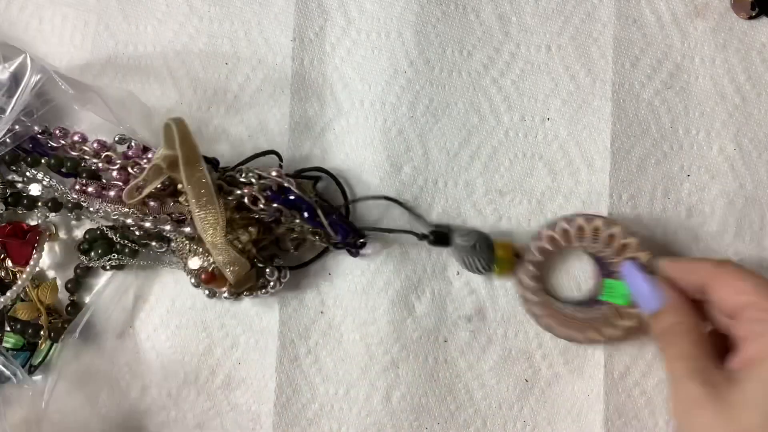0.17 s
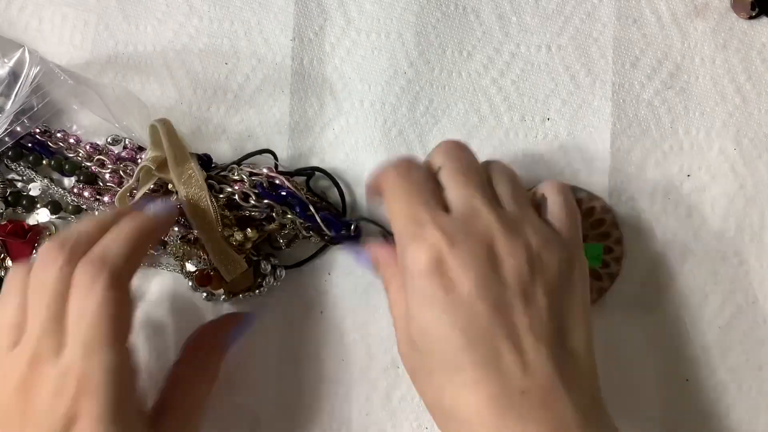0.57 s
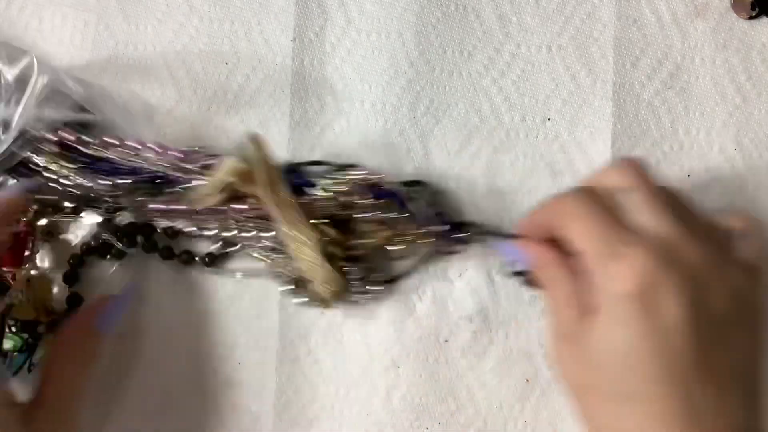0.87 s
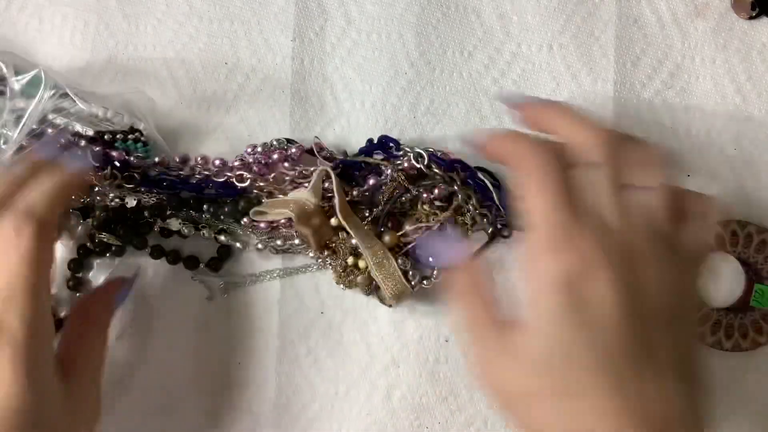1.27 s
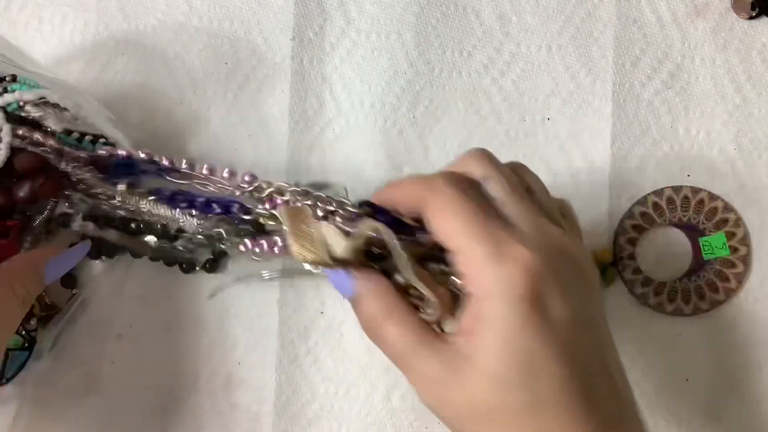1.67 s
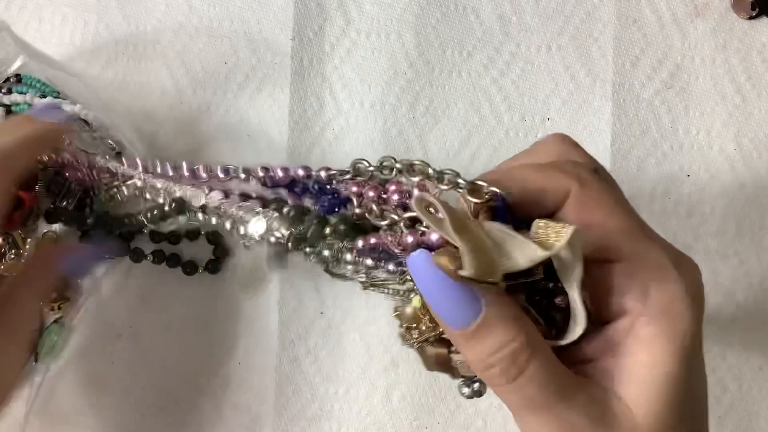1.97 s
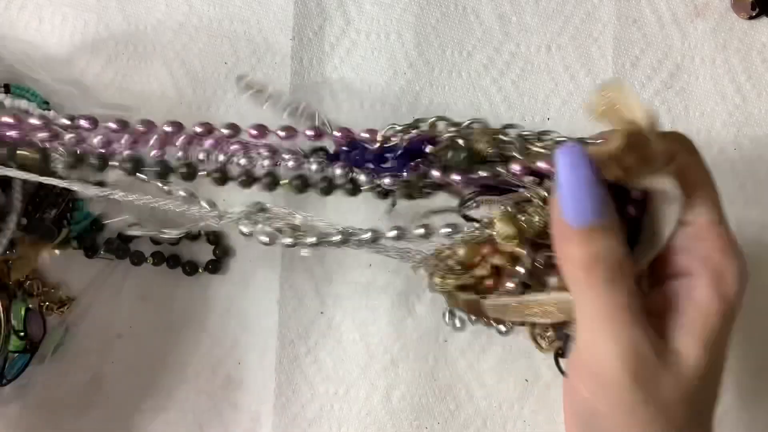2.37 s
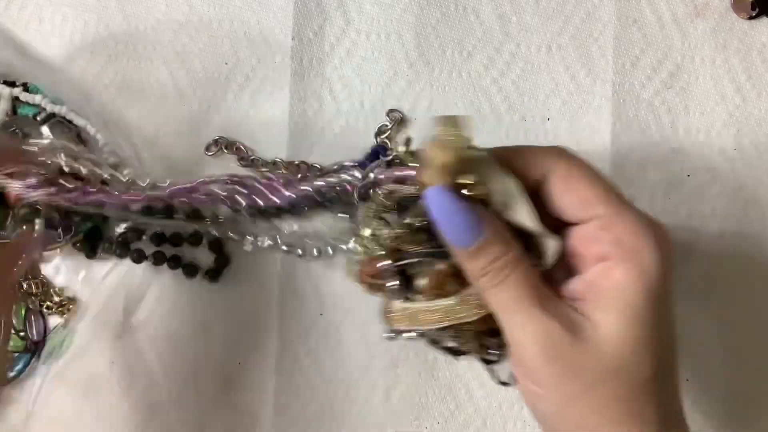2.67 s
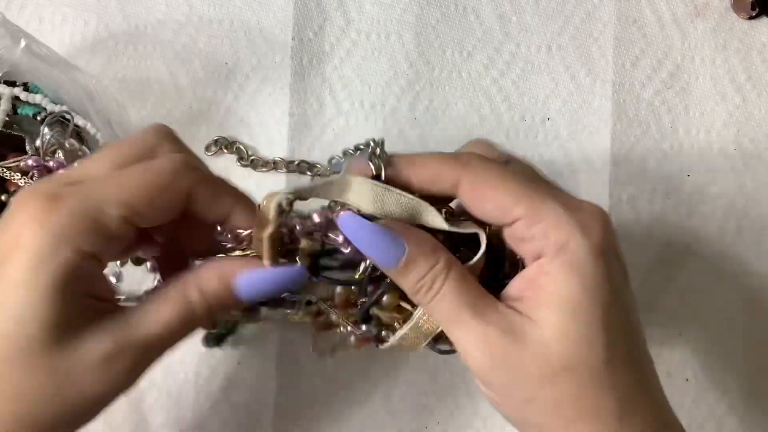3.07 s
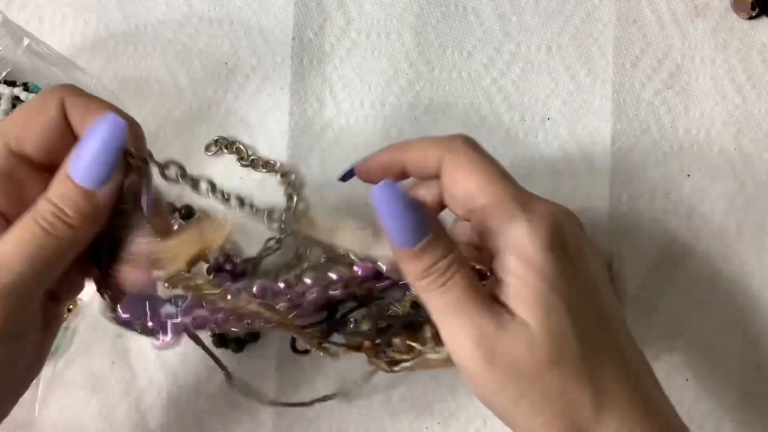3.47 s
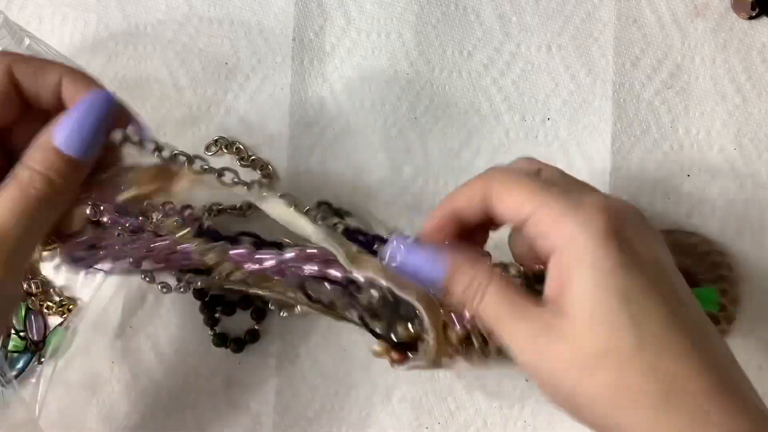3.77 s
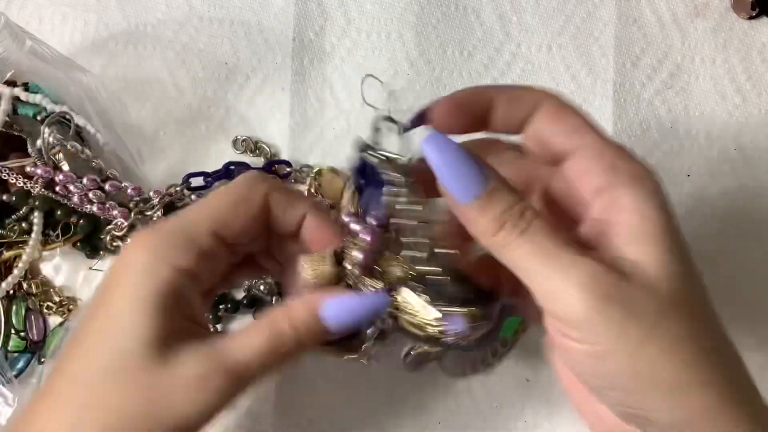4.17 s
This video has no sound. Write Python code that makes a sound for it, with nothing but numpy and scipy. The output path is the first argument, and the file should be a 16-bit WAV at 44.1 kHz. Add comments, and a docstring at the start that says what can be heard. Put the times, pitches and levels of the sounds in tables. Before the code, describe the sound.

Hands drag a tangle of bead necklaces and fine chains over a cloth-covered table, making a soft, uneven rustle dotted with small clicks. The table gives a few dull bumps. Midway the clicking gets busier, with tiny metallic pings and light pendant knocks. The rustle then thins as the tangle is lifted, and one sharper clack comes near the end. The microphone is close, in a small quiet room.

```python
"""Bead necklaces and chains rustle as hands draw them over a cloth-covered table, close by in a small room.
The rustle is swarms of tiny collisions: fine links, beads, and the heap dragging on the cloth.
Lifting the tangle frees the links and unloads the cloth. Single beads click, small metal parts ping,
heavier pendants knock on the table, and the table top thumps when bumped. Low room tone lies underneath."""
import sys
import numpy as np
from scipy import signal
from scipy.fft import rfft, irfft, next_fast_len
from scipy.io import wavfile
from scipy.ndimage import uniform_filter1d, map_coordinates

SR = 44100
rng = np.random.default_rng(int(sys.argv[2]) if len(sys.argv) > 2 else 0)


def persist_wave(psi):
    """Save psi, clipped to +-1, as 16-bit WAV."""
    counts = np.round(np.clip(psi, -1, 1) * 32767).astype(np.int16)
    wavfile.write(sys.argv[1], SR, np.atleast_2d(counts).T)


N = 190159
TOP_HZ = 16000


def rustle(gains, falter_db=0.8, clump_db=3.5):
    """Links and beads tumble in little clumps while the hand drags the heap a little unevenly."""
    links_gain, beads_gain, drag_gain = gains * amp(falter_db * wobble(knots_per_s=25))
    clumps = amp(clump_db * wobble(knots_per_s=220))
    links = links_gain * chain_links(clumps)
    beads = amp(-2) * beads_gain * tumbling_beads(clumps)
    drag = drag_gain * cloth_drag()
    return in_room(links + beads + drag, wet_db=-11)


# Hand moves. Each row: start, rise, hold and fall in seconds, strength in dB,
# lift from 0 (dragging on the cloth) to 1 (dangling).
HAND_MOVES = [(0.0, 0.0085, 0.028, 0.088, -58, 0), (0.107, 0.021, 0.053, 0.05, -69.5, 0.59),
              (0.369, .015, 0.071, .05, -60.5, 0), (0.404, 0.026, .03, .04, -54, 0.08),
              (0.612, 0.057, 0.025, .1, -51, 0.4), (0.658, 0.068, 0.16, 0.066, -44, 0.44),
              (0.9, 0.015, 0.067, .1, -57, 0.55), (1.032, .02, .03, 0.13, -65, 0),
              (1.18, 0.032, 0.024, 0.067, -49.5, 0.14), (1.254, 0.018, 0.21, .1, -54.5, 0.26),
              (1.504, 0.047, 0.11, 0.2, -54, 0.82), (1.616, 0.11, 0.074, 0.28, -52, 0.83),
              (1.905, 0.078, 0.4, .15, -50.5, 0.47), (2.317, 0.049, 0.15, .1, -52.5, 0.3),
              (2.465, 0.033, 0.073, 0.057, -44, 0.65), (2.545, .02, 0.047, 0.027, -46.5, 0.28),
              (2.753, 0.067, 0.048, 0.39, -54, 0.95), (2.94, 0.032, 0.082, 0.085, -59, 0),
              (3.019, 0.052, 0.31, 0.58, -61.5, 1), (3.496, 0.021, 0.087, .08, -63.5, 0.82),
              (3.706, 0.065, 0.072, 0.06, -51.5, 0.84), (3.804, 0.018, 0.037, 0.052, -46.5, 0.22),
              (4.267, 0.051, .03, .05, -51, 0.81)]


def handling(swell_db=20, sag_db_per_s=6.5):
    """Gains of links, beads and cloth: lifting frees the fine links and takes weight off the cloth."""
    t, power = np.arange(N) / SR, np.zeros((3, N))
    grip = (0.5, 0.12, N / SR, 0.12, -64, 0.58)  # held to the end: the tangle is never quite still
    moves = [(move, sag_db_per_s) for move in HAND_MOVES] + [(grip, 0)]
    for (start_s, rise_s, hold_s, fall_s, db, lift), sag in moves:
        held_s = t - start_s - rise_s
        ramp = np.minimum(held_s / rise_s, (hold_s - held_s) / fall_s)
        shape_db = swell_db * np.minimum(ramp, 0) - sag * np.clip(held_s, 0, hold_s)
        links_db, drag_db = -10 + 24 * lift, 2 - 14.5 * lift
        power += np.outer(amp([links_db, 0, drag_db]), amp(db + np.maximum(shape_db, -100))) ** 2
    return np.sqrt(power)


# Tone of the fine links. Each row: frequency in Hz, relative gain in dB.
LINK_SPECTRUM = [(1500, -26.5), (3500, -3.5), (6000, 1.5), (6700, -10.5), (9000, -8.5), (12600, -3),
                 (14000, -3.5), (16000, 1)]


def chain_links(clumps, shimmer_hz=12600, shimmer_db=-3):
    """Fine links collide; many like links share one ring, a narrow shimmer."""
    swarm = contacts(per_s=3200, centre_hz=10500, log_spread=0.36, t60_cycles=18.6, size_db=2.5)
    links = colour(swarm, LINK_SPECTRUM) * clumps
    return unit(links + amp(shimmer_db) * resonate(links, shimmer_hz, width_hz=250))


# Tone of the beads. Each row: frequency in Hz, relative gain in dB.
BEAD_SPECTRUM = [(600, -3), (1500, -9.5), (2500, -5), (3500, 0), (5000, 7.5), (5900, 2.5), (6600, 0),
                 (12000, -3)]


def tumbling_beads(clumps):
    """Beads collide, ringing lower than the links."""
    swarm = contacts(per_s=2200, centre_hz=4000, log_spread=0.87, t60_cycles=12, size_db=2.5)
    return unit(colour(swarm, BEAD_SPECTRUM) * clumps)


# Tone of the heap on the cloth. Each row: frequency in Hz, relative gain in dB.
CLOTH_SPECTRUM = [(40, -42), (100, 1), (250, -2), (400, -3), (620, -1.5), (850, -4), (1300, 3), (2300, 1.5),
                  (6000, -20)]


def cloth_drag():
    """The heap drags over the cloth in dull contacts that barely ring."""
    swarm = contacts(per_s=1100, centre_hz=900, log_spread=1.12, t60_cycles=1.85, size_db=3.5)
    return unit(colour(swarm, CLOTH_SPECTRUM))


def contacts(per_s, centre_hz, log_spread, t60_cycles, size_db):
    """A swarm of tiny collisions, each a damped ring of its own pitch and size; steady rms 1."""
    when, pitch, size = rng.random((int(per_s * N / SR), 3)).T
    hz = np.minimum(centre_hz * np.exp(log_spread * (2 * pitch - 1)), TOP_HZ)[:, None]
    k = np.arange(SR // 250)
    strength = amp(size_db * np.minimum(-np.log(1 - size), 4))  # many small, few large
    rings = strength[:, None] * np.sin(2 * np.pi * hz * k / SR) * fade(k / SR, t60_cycles / hz)
    positions = (when * N).astype(int)[:, None] + k
    swarm = np.bincount(positions.ravel(), rings.ravel(), N)[:N]
    local_power = np.abs(uniform_filter1d(swarm ** 2, SR // 12))
    return swarm / np.sqrt(local_power + 1e-9)


# Distinct snaps of beads and clasps. Each row: start in seconds, level in dB, band centre in Hz.
BEAD_CLICKS = [(.0264, -37, 8950), (.0302, -46.5, 8600), (.4386, -45, 12400), (.4764, -25, 4260),
               (.6165, -46, 8600), (.6318, -38.5, 4800), (.7581, -31, 5250), (.871, -29, 4740),
               (.8943, -31.5, 10500), (.9652, -38, 13400), (1.0023, -40, 6360), (1.0745, -38.5, 8350),
               (1.1273, -38, 7300), (1.285, -41.5, 3500), (1.3636, -27, 3740), (1.3716, -30.5, 5070),
               (1.4395, -29, 4630), (1.4489, -36, 8060), (1.5382, -39, 5000), (1.9424, -34.5, 8300),
               (2.0164, -25, 6530), (2.1215, -32.5, 5060), (2.1778, -22, 4300), (2.4178, -31, 4900),
               (2.4557, -26.5, 3950), (2.4598, -27.5, 5810), (2.4904, -25, 4440), (2.5011, -17, 6430),
               (2.6805, -37.5, 8000), (2.9443, -34.5, 10300), (3.1963, -32, 11500), (3.363, -35, 11500),
               (3.397, -33, 11700), (3.6671, -37, 8800), (3.7061, -33, 10500), (3.7663, -32.5, 10500),
               (3.829, -23.5, 7500), (3.991, -43, 10400), (4.0394, -42, 8600), (4.0523, -33.5, 10000),
               (4.0872, -33.5, 12500), (4.1107, -32, 11850), (4.3021, -31, 9500)]


def bead_clicks(links_gain, chatter_db=-21, ring_db=-3, band_ratio=1.42):
    """One hard bead snaps against another: a crack, a short ring from each, faint chatter of neighbours."""
    out, t = np.zeros(N), np.arange(SR // 4) / SR
    contact, chatter = fade(t, t60_s=0.004), fade(t, t60_s=0.04)
    for start_s, db, hz in BEAD_CLICKS + stray_clicks(links_gain):
        crack = rng.standard_normal(len(t)) * (contact + amp(chatter_db) * chatter)
        large_bead = np.sin(2 * np.pi * hz * 0.67 * t)
        small_bead = np.sin(2 * np.pi * hz * 1.122 * t)
        ring = amp(ring_db) * (large_bead + small_bead) * contact
        snap = band(crack + ring, hz / band_ratio, hz * band_ratio, order=1)
        snap = band(snap, 1080, TOP_HZ, order=2)
        snap /= np.sqrt(np.sum(snap[:SR // 500] ** 2) / (SR // 1000))  # first 2 ms, as if packed in 1 ms
        add(out, start_s, in_room(amp(db) * snap, wet_db=-9))
    return out


def stray_clicks(links_gain, per_s=17, over_db=7, spread_db=1, centre_hz=10000):
    """Click rows for small chance snaps, as strong as the links are moving."""
    count = int(per_s * N / SR)
    when, size, pitch = rng.random((count, 3)).T
    onsets = ((np.arange(count) + when) / count * N).astype(int)
    level_db = 20 * np.log10(links_gain[onsets]) + over_db + spread_db * (2 * size - 1)
    return list(zip(onsets / SR, level_db, centre_hz * 2 ** (pitch - 0.5)))


# Modes of a pendant on the table. Each row: frequency in Hz, width in Hz, gain in dB.
PENDANT_MODES = [(342, 180, -4.5), (434.5, 24, 1.5), (637, 130, -6), (1016, 12, 1.5), (1394, 130, -5),
                 (1500, 15, 2), (2026, 230, -0.5), (2740, 130, 0), (3470, 590, 0), (3840, 360, 4.5),
                 (4230, 860, -3.5), (5300, 110, 2.5), (5900, 220, 2)]
# Pendant landings, and the short lower clack of the loudest bead snap at 2.5 s. Each row: start in
# seconds, level in dB, low band edge in Hz (heavier is lower), high band edge in Hz, rattle t60 in seconds.
KNOCK_HITS = [(0.013, -47, 900, 2230, 0.013), (.148, -42, 198, 1090, 0.019),
              (0.452, -43.5, 900, 2200, 0.025), (.477, -36, 350, 4000, 0.013),
              (.758, -41, 300, 2010, 0.025), (0.874, -41, 500, 2180, 0.01),
              (1.211, -46.5, 815, 2770, 0.043), (1.29, -47, 700, 1590, 0.028),
              (1.372, -44.5, 600, 2600, 0.0091), (1.448, -39.5, 700, 2430, 0.011),
              (2.1774, -31, 516, 4730, 0.063), (2.189, -38.5, 217, 2240, 0.06),
              (2.251, -39.5, 500, 1680, 0.021), (2.335, -31, 249, 4000, 0.047),
              (2.339, -28, 241, 5200, 0.086), (2.5005, -28, 2320, 5000, .006),
              (2.99, -42.5, 303, 1820, 0.021), (3.029, -44.5, 402, 2040, 0.018),
              (3.552, -48, 140, 660, 0.03), (3.718, -50.5, 1160, 2530, 0.021),
              (3.823, -19.5, 384, 7600, 0.019)]


def knocks(crack_db=-6, strike_db=-1):
    """Pendant landings and one bead clack: a blow and rattle stir damped modes; cloth dulls soft landings."""
    out, t = np.zeros(N), np.arange(SR // 2) / SR
    for start_s, db, low_hz, high_hz, t60_s in KNOCK_HITS:
        rattle = rng.standard_normal(len(t)) * fade(t, t60_s) * (1 - np.exp(-t / 0.0016))
        force = rattle + amp(strike_db) * np.linalg.norm(rattle) * (t == 0)
        ring = sum((-1) ** k * amp(mode_db) * resonate(force, hz, width_hz)
                   for k, (hz, width_hz, mode_db) in enumerate(PENDANT_MODES))
        blow = band(amp(crack_db) * rattle + ring, low_hz, high_hz, order=2)
        blow /= np.sqrt(np.mean(blow[:SR // 250] ** 2))  # rms 1 over the first 4 ms
        add(out, start_s, in_room(amp(db) * blow, wet_db=-7))
    return out


# Small metal parts ringing. Each row: start in seconds, level in dB, pitch in Hz, t60 in seconds.
METAL_PINGS = [(0.144, -53, 2790, 0.062), (1.670, -26.5, 13950, .025), (2.036, -32, 9580, 0.032),
               (2.094, -33, 14000, 0.031), (2.128, -26.5, 14000, 0.031), (2.185, -20.5, 8880, 0.055),
               (2.186, -32, 10070, 0.056), (2.223, -39, 8830, 0.068), (2.346, -36, 12760, 0.16),
               (2.407, -41, 12700, 0.068), (2.461, -22.5, 8850, 0.03), (2.503, -23, 8780, 0.09),
               (2.507, -23, 14200, 0.028), (2.521, -30.5, 11150, 0.12), (3.540, -40.5, 12300, 0.11),
               (3.826, -54, 3470, 0.54), (3.837, -43, 12620, 0.21)]


def metal_pings(tremble=0.32):
    """Small metal parts ring briefly, trembling against the chain they hang from."""
    out, t = np.zeros(N), np.arange(SR // 3) / SR
    for start_s, db, hz, t60_s in METAL_PINGS:
        flutter, phase_rad = [tremble * unit(band(noise, 40, 350, order=1))
                              for noise in rng.standard_normal((2, len(t)))]
        ring = (1 + flutter) * np.sin(2 * np.pi * hz * t + phase_rad) * fade(t, t60_s)
        add(out, start_s, in_room(amp(db) * ring, wet_db=-13))
    return out


# Bumps on the table top. Each row: start in seconds, level in dB.
TABLE_THUMPS = [(0.478, -43), (0.833, -45), (1.136, -31), (1.375, -37), (2.522, -42), (3.824, -37.5)]


def table_thumps(lower_hz=232, upper_hz=300, upper_db=-7, t60_s=0.048):
    """Bumped by the hand or the heap, the table top rings briefly in two low modes."""
    out, t = np.zeros(N), np.arange(SR // 3) / SR
    board = np.sin(2 * np.pi * lower_hz * t) + amp(upper_db) * np.sin(2 * np.pi * upper_hz * t)
    thump = board * fade(t, t60_s) * (1 - np.exp(-t / 0.0011))
    for start_s, db in TABLE_THUMPS:
        add(out, start_s, in_room(amp(db) * thump, wet_db=-13))
    return out


# Reverberation of the room. Each row: frequency in Hz, t60 in seconds.
ROOM_DECAY = [(150, 0.47), (400, 0.26), (1000, 0.26), (3000, 0.22), (7000, 0.19), (15000, 0.17)]


def in_room(x, wet_db, build_s=0.0014):
    """The sound plus a fresh diffuse tail; each frequency dies at its own speed."""
    hz, frame_s, noise = signal.stft(rng.standard_normal(SR // 2), SR, nperseg=256)
    decay = fade(frame_s, along(ROOM_DECAY, hz)[:, None])
    tail = signal.istft(noise * decay, SR, nperseg=256)[1]
    tail *= 1 - np.exp(-(np.arange(len(tail)) / SR / build_s) ** 2)
    return x + amp(wet_db) * signal.fftconvolve(x, tail / np.linalg.norm(tail))[:len(x)]


# Tone of the room's air. Each row: frequency in Hz, relative gain in dB.
AIR_SPECTRUM = [(15, -45), (25, 1), (70, 0.5), (236, -0.5), (560, -18), (677, -13), (936, -33), (1070, -13),
                (1740, -32), (2690, -25.5), (3820, -29.5), (11300, -32.5), (14400, -36), (16000, -66)]


def room_tone(level_db=-62):
    """The steady low murmur of the room's air."""
    shape = amp(along(AIR_SPECTRUM, np.fft.rfftfreq(N, 1 / SR)))
    return amp(level_db) * unit(irfft(rfft(rng.standard_normal(N)) * shape, N))


def amp(db):
    """Decibels to gain."""
    return 10 ** (np.asarray(db) / 20)


def unit(x):
    """Scale to rms 1."""
    return x / np.sqrt(np.mean(x ** 2) + 1e-20)


def along(points, hz):
    """Read (Hz, value) points on a log frequency axis."""
    knots_hz, values = np.transpose(points)
    return np.interp(np.log(hz + 1), np.log(knots_hz), values)


def colour(x, spectrum, size=2048):
    """Minimum-phase filter of the given (Hz, dB) shape; attacks stay sharp."""
    cepstrum = irfft(np.log(amp(along(spectrum, np.fft.rfftfreq(size, 1 / SR)))))
    cepstrum[1:size // 2] *= 2
    cepstrum[size // 2 + 1:] = 0
    return signal.fftconvolve(x, irfft(np.exp(rfft(cepstrum))))[:len(x)]


def band(x, low_hz, high_hz, order):
    """Causal band-pass, at least an octave wide."""
    high_hz = min(high_hz, SR * 0.47)
    edges_hz = [min(low_hz, high_hz / 2), high_hz]
    return signal.sosfilt(signal.butter(order, edges_hz, "band", fs=SR, output="sos"), x)


def resonate(x, hz, width_hz):
    """One mode driven by x, gain 1 at its centre."""
    return signal.lfilter(*signal.iirpeak(hz, hz / width_hz, fs=SR), x)


def fade(t, t60_s):
    """Decay of 60 dB in t60_s."""
    return np.exp(-np.log(1000) * t / t60_s)


def wobble(knots_per_s):
    """A smooth random curve."""
    knots = rng.standard_normal(int(N * knots_per_s / SR) + 4)
    return map_coordinates(knots, [np.arange(N) * knots_per_s / SR])


def add(track, start_s, sound):
    """Mix a sound into the track."""
    start = max(round(start_s * SR), 0)
    track[start:start + len(sound)] += sound[:max(N - start, 0)]


def scene():
    """Everything at one close microphone."""
    gains = handling()
    hits = knocks() + metal_pings() + table_thumps() + bead_clicks(links_gain=gains[0])
    return (hits + rustle(gains) + room_tone())[None]


def record(dry, low_cut_hz=43):
    """The recorder drops the deepest bass and everything above TOP_HZ."""
    size = next_fast_len(N + SR // 4)
    hz = np.fft.rfftfreq(size, 1 / SR)
    low_cut = 1 / np.sqrt(1 + (low_cut_hz / (hz + 1)) ** 16)
    return irfft(rfft(dry, size) * low_cut * (hz < TOP_HZ), size)[:, :N]


dry = scene()
out = record(dry)
persist_wave(out)
```